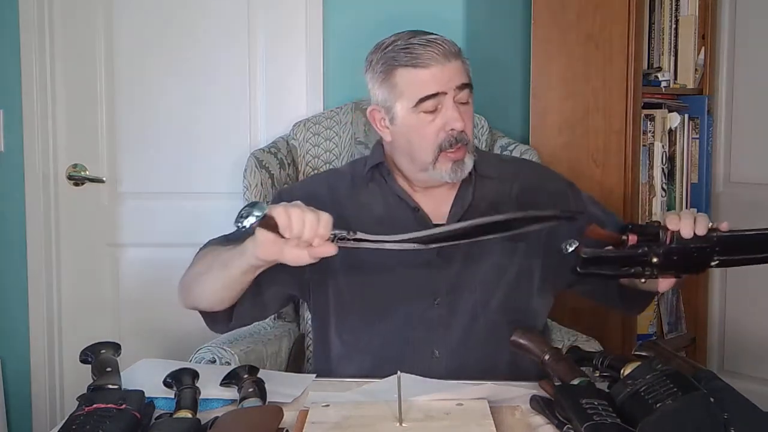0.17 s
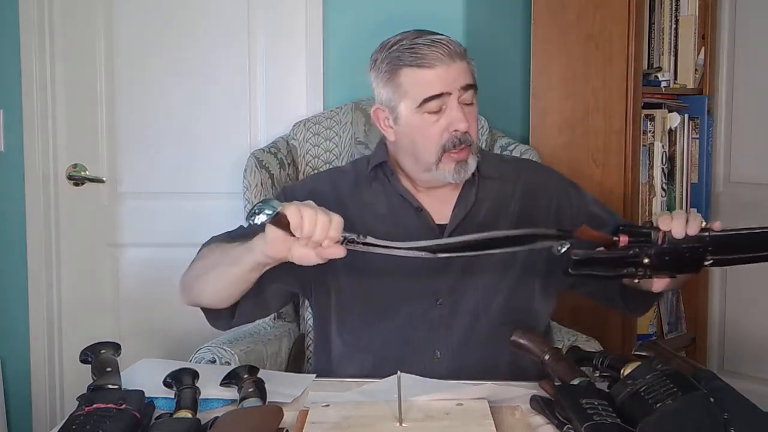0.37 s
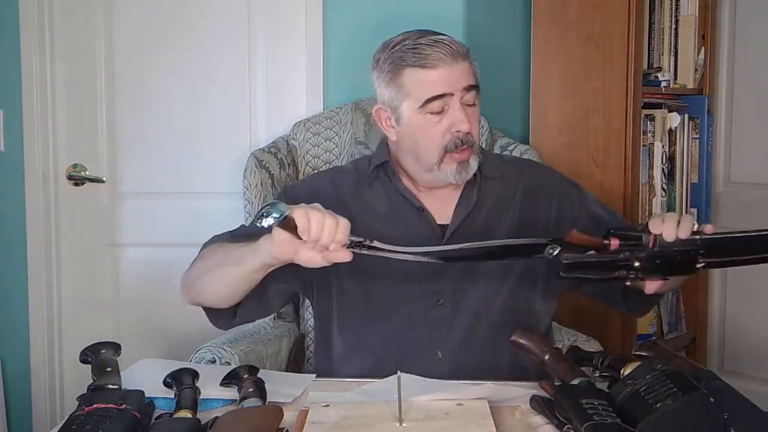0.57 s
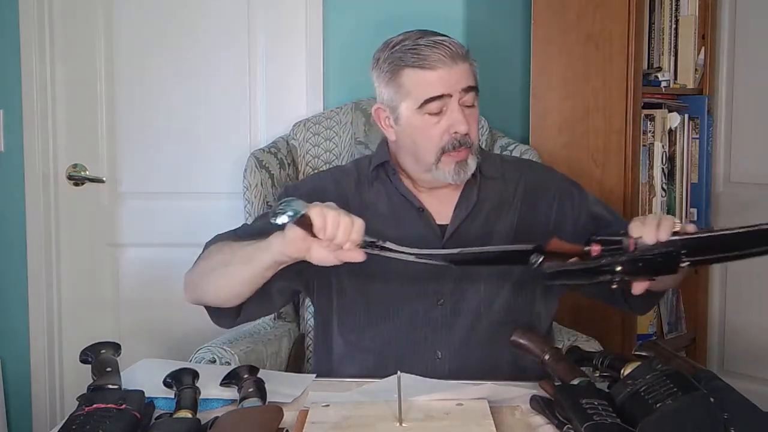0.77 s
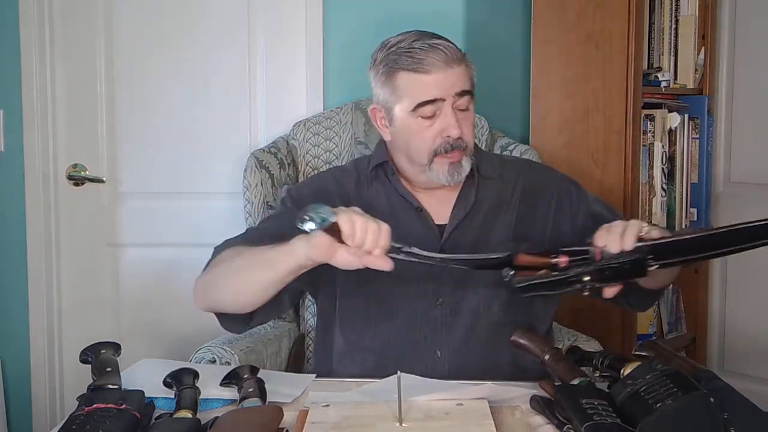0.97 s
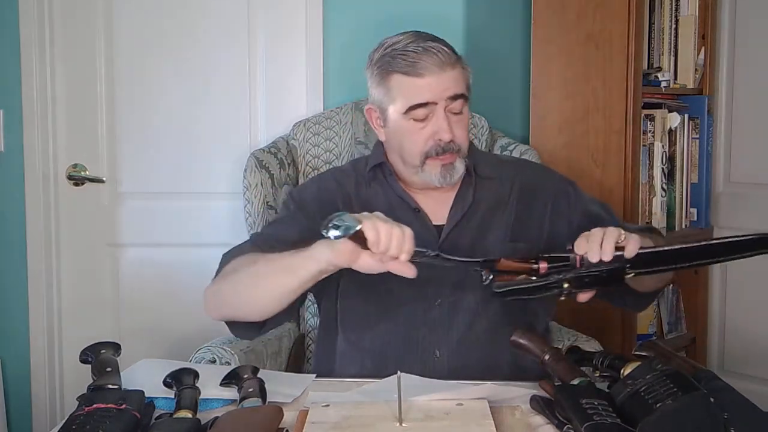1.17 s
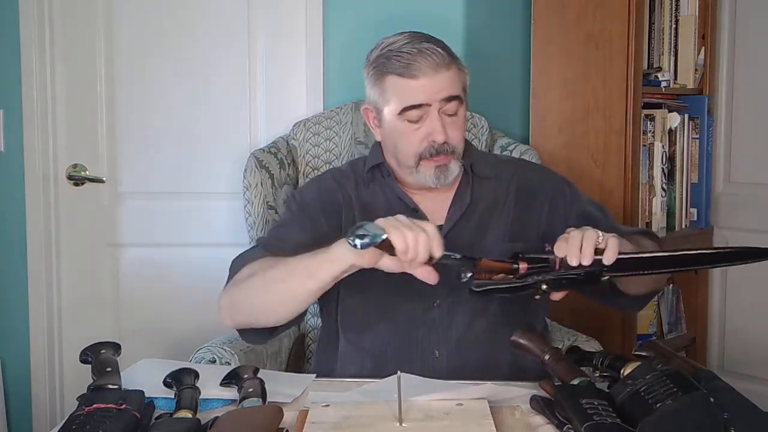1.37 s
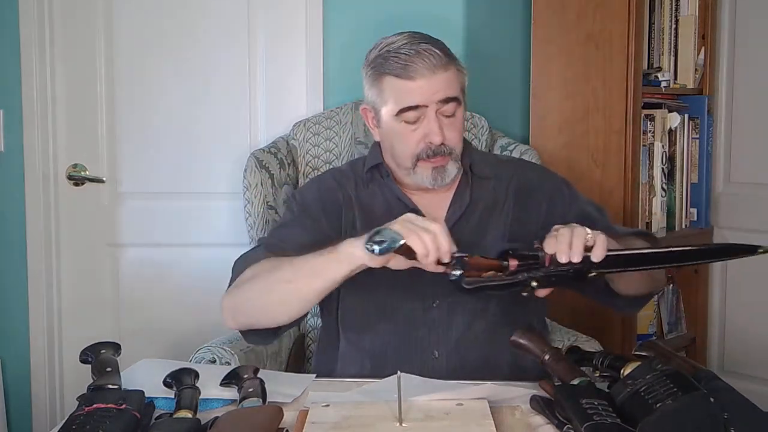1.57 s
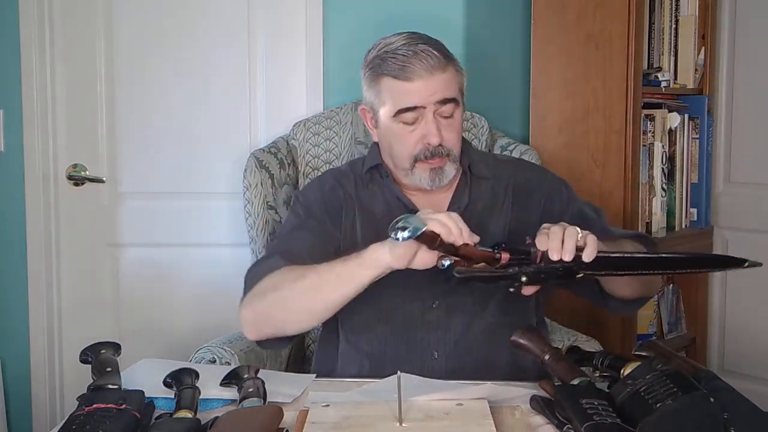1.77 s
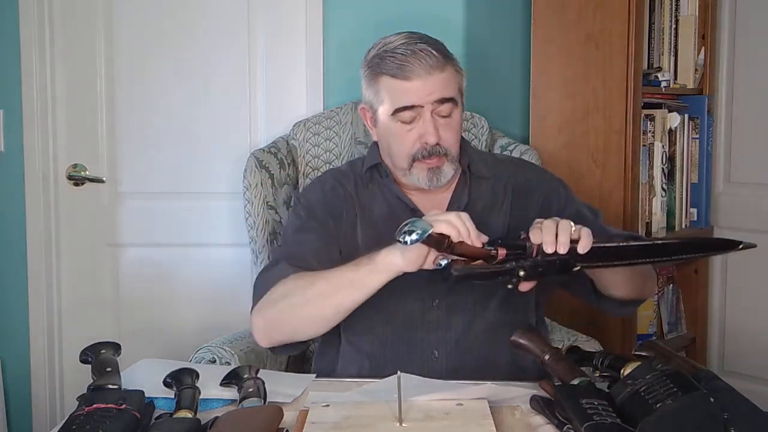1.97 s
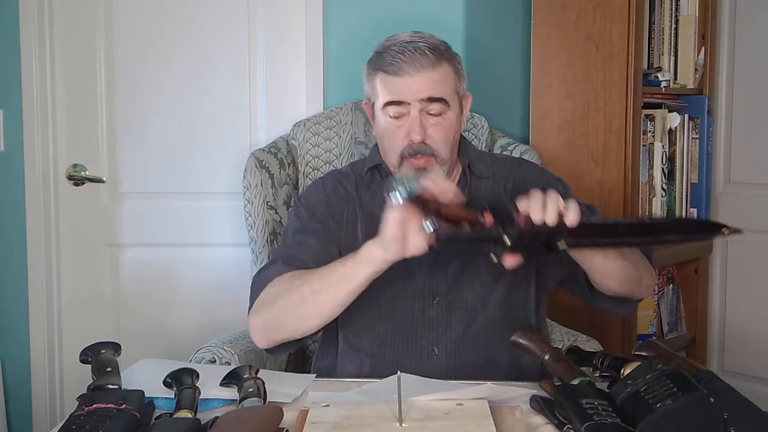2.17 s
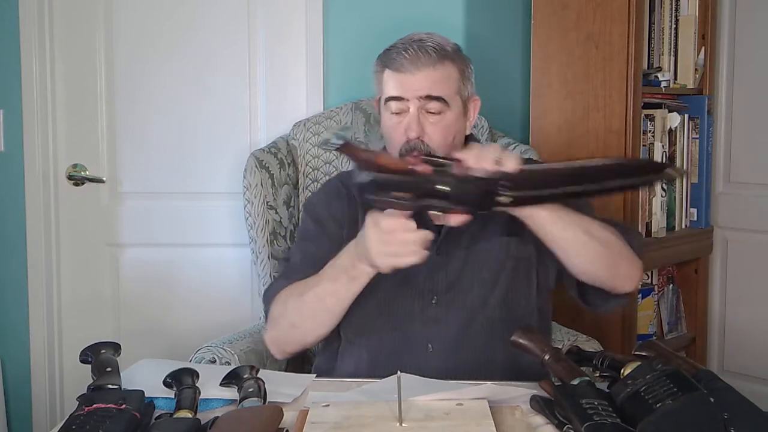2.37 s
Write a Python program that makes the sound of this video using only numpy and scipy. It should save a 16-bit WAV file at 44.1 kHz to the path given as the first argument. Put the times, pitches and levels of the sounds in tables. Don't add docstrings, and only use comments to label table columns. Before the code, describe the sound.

A heavy blade is sheathed in a wooden, leather-covered scabbard. After near quiet, faint ticks and a rub start at 0.5 s, with light knocks from 0.7 to 1.0 s. Dry scraping follows, a click at 1.45, then a loud metallic clack at 1.6 with a brief ring. A hollow double knock lands at 1.9; small ticks and a short scrape at 2.3. Small room echo, boxy midrange microphone, soft hiss and hum.

```python
import sys
import numpy as np
from scipy import signal
from scipy.fft import rfft, irfft
from scipy.io import wavfile

SR = 44100
rng = np.random.default_rng(int(sys.argv[2]) if len(sys.argv) > 2 else 0)


def to_wav(sig):
    pcm = np.clip(np.atleast_2d(sig), -1, 1) * 32767
    pcm = np.round(pcm).astype(np.int16)
    wavfile.write(sys.argv[1], SR, pcm.T)


def attenuation_scalar(level_db):
    decades = np.asarray(level_db, float) / 20
    return 10 ** decades


N = 106986
SEATING_S = 1.597


def rms_one(x):
    return x / np.sqrt(np.mean(x ** 2) + 1e-20)


def at_hz(points, hz):
    p = np.array(points)
    return np.interp(np.log(np.maximum(hz, 1)), np.log(p[:, 0]), p[:, 1])


def coloured(points):
    white = rfft(rng.standard_normal(N))
    gain = attenuation_scalar(at_hz(points, np.linspace(0, SR / 2, len(white))))
    return rms_one(irfft(white * gain, N))


def ring(x, hz, t60):
    radius, angle = attenuation_scalar(-60 / (t60 * SR)), 2 * np.pi * hz / SR
    feedback = [1, -2 * radius * np.cos(angle), radius * radius]
    return signal.lfilter([0, np.sin(angle)], feedback, x + 1e-18)


def add(out, s, sound):
    i = int(s * SR)
    out[i:i + len(sound)] += sound[:len(out) - i]


def filtered(x, kind, hz, order):
    return signal.sosfilt(signal.butter(order, hz, kind, fs=SR, output="sos"), x)


def peak_one(x):
    return x / abs(x).max(axis=1, keepdims=True)


# start in seconds, peak level in dB, body pitch in Hz,
# metallic edge in dB against the thud, room answer in dB.
KNOCKS = [(0.525, -34.5, 1370, -1, -4), (0.5304, -33.5, 2640, 17.5, -1.5), (0.726, -25.5, 1630, 11.5, -5.5),
          (0.749, -35, 1400, 23.5, -9.5), (0.882, -25, 1570, 12, -5.5), (0.918, -33.5, 1930, 4, -6.5),
          (1.008, -22.5, 2560, 15, -2.5), (1.4441, -23, 3100, 21.5, -13.5), (1.455, -32, 1690, 18.5, -3.5),
          (1.597, -8.5, 2160, 10.5, -2), (1.6127, -13, 1404, -10, -6.5), (1.841, -30.5, 2900, 18, -10),
          (1.848, -30, 2070, 14, -1.5), (1.86, -31, 1840, -1, -6.5), (1.9022, -13, 2430, 14, -1.5),
          (1.911, -11, 1560, 12.5, -9.5), (2.089, -39.5, 2970, 4, -14), (2.2976, -27, 3330, 5, -18),
          (2.306, -56, 3000, -1, 3), (2.372, -40.5, 2480, 23.5, -6.5)]


def knocks():
    chatter, thud_s, edge_s = 0.3, 0.002, 0.0008
    body_t60_s, edge_hz, room_db = 0.0035, 1960, 12
    out, t = np.zeros(N), np.arange(1000) / SR
    click = 1. * (t == 0)
    for s, db, hz, edge_db, answer_db in KNOCKS:
        touch = chatter * rng.standard_normal(len(t))
        contact = np.array([click + touch * np.exp(-t / thud_s), click])
        thud = filtered(contact, "band", [0.35 * hz, 1.4 * hz], 2)
        thud = thud + ring(thud, hz, body_t60_s) * hz / SR * 20
        scrape = np.array([click + touch * np.exp(-t / edge_s), click])
        edge = filtered(scrape, "high", edge_hz, 2)
        direct, to_room = attenuation_scalar(db) * (peak_one(thud) + attenuation_scalar(edge_db) * peak_one(edge))
        add(out, s, direct)
        add(out, s, attenuation_scalar(answer_db + room_db) * room(to_room))
    return out


# pitch in Hz, level in dB, decay by 60 dB in seconds.
GUARD_MODES = [(7180, -26, .004), (11100, -16, .004), (13100, -10, .004)]


def guard():
    chatter_s, crack_hz, level_db, room_db = 0.00078, 7500, 10, 11
    out, t = np.zeros(N), np.arange(2000) / SR
    chatter = rng.standard_normal(len(t)) * np.exp(-t / chatter_s)
    contact = np.array([chatter, 1. * (t == 0)])
    crack = filtered(contact, "high", crack_hz, 4)
    modes = sum(attenuation_scalar(db) * ring(contact, hz, t60) for hz, db, t60 in GUARD_MODES)
    direct, to_room = attenuation_scalar(level_db) * (crack + modes)
    add(out, SEATING_S, direct)
    add(out, SEATING_S, attenuation_scalar(room_db) * room(to_room))
    return out


# pitch in Hz, level in dB, decay by 60 dB in seconds.
RING = [(861, -12, .1), (935, -4, 0.22), (1022, -10.5, 0.15), (1356, -9, 0.06), (1270, -4, 0.085),
        (1550, -22, .15), (1698, -13, .12), (2230, -19, 0.17), (2214, -4.5, .12), (2609, -11, 0.26),
        (3530, 0.5, 0.063)]


def blade_ring():
    level_db = -17.5
    click = 1. * (np.arange(N) == int(SEATING_S * SR))
    return sum(attenuation_scalar(level_db + db) * ring(click, hz, t60) for hz, db, t60 in RING)


# start in seconds, peak level in dB, pitch in Hz.
THUMPS = [
    (0.726, -47.5, 474),
    (0.752, -47.5, 248),
    (1.007, -39.5, 445),
    (1.02, -51, 324),
    (1.598, -35, 465),
    (1.903, -45.5, 200),
    (1.904, -33.5, 816),
]


def thumps():
    t60_s, room_db = 0.014, 4.5
    out, t = np.zeros(N), np.arange(4000) / SR
    for s, db, hz in THUMPS:
        level = attenuation_scalar(db - at_hz(MIC, hz))
        hit = level * np.sin(2 * np.pi * hz * t) * attenuation_scalar(-60 * t / t60_s)
        add(out, s, hit)
        add(out, s, attenuation_scalar(room_db) * room(hit))
    return out


# time in seconds, level in dB.
RUB = [(0, -72.5), (0.502, -74), (0.559, -58), (.68, -75), (.8, -68), (1.0, -63.5), (1.11, -56),
       (1.18, -58.5), (1.229, -55.5), (1.3, -63.5), (1.4, -59), (1.5, -61), (1.801, -62.5), (2.001, -63.5),
       (2.12, -63), (2.278, -67.5), (2.331, -53), (2.43, -86)]


def rub():
    slips_per_s, spread_db, room_db = 490, -5.5, -3.5
    body_hz, rasp_hz, rasp_db, rasp_follows = 2480, 4800, 4.5, 1.3
    s, db = np.transpose(RUB)
    db = np.interp(np.arange(N) / SR, s, db)
    sizes = attenuation_scalar(spread_db * np.minimum(rng.exponential(1, N), 4)) * rng.choice([-1, 1], N)
    slips = sizes * (rng.random(N) < slips_per_s / SR)
    body = attenuation_scalar(db + 19.5) * rms_one(filtered(slips, "high", body_hz, 1))
    rasp = rms_one(filtered(slips, "high", rasp_hz, 3))
    rasp = attenuation_scalar(rasp_db + rasp_follows * (db - db.max())) * rasp
    direct = body + attenuation_scalar(db.max() + 20.5) * rasp
    return direct + attenuation_scalar(room_db) * room(direct)[:N]


# frequency in Hz, decay by 60 dB in seconds.
ROOM_T60 = [(300, 0.42), (800, 0.32), (2000, 0.34), (5500, 0.27), (12000, 0.28)]


def room(x):
    wall_gap_s, early_per_s, early_db, early_t60_s = 0.0051, 1100, -1.5, 0.27
    t = np.arange(SR // 2) / SR
    white, tail = rng.standard_normal(len(t)), 0
    for low in 125 * 2. ** np.arange(7):
        band = filtered(white, "band", [low, 2 * low], 2)
        tail = tail + band * attenuation_scalar(-60 * t / at_hz(ROOM_T60, low * np.sqrt(2)))
    echoes = (rng.random(len(t)) < early_per_s / SR) * rng.uniform(-1.36, 1, len(t))
    early = echoes * attenuation_scalar(-60 * t / early_t60_s)
    answer = rms_one(tail) + attenuation_scalar(early_db) * rms_one(early)
    answer = answer * np.clip(t / wall_gap_s, 0, 1) ** 2
    return signal.fftconvolve(x, answer / np.sqrt(np.sum(answer ** 2)))


# frequency in Hz, level in dB per Hz.
AIR = [(200, 11), (1000, -4), (3000, -4.5), (4300, -4), (5400, -2.5), (6600, -23), (16000, -37)]


def air():
    return attenuation_scalar(-46.5) * coloured(AIR)


def scene():
    return (knocks() + guard() + blade_ring() + thumps() + rub() + air())[None]


# frequency in Hz, gain in dB.
MIC = [(100, -43.5), (400, -28.5), (900, -4.5), (1400, -2.5), (3000, -4), (4300, -17), (6500, -38.5),
       (13500, -55.5)]
# centre in Hz, width in Hz, peak in dB.
HOUSING = [(1368, 210, 5.2), (2072, 490, 6.6), (2910, 700, 3.5), (7350, 2000, 12), (11000, 4500, 6.6)]
# centre in Hz, width in Hz.
NOTCHES = [(6000, 1330), (8080, 970), (16500, 1000)]


def microphone(x):
    size = 4096
    hz = np.linspace(0, SR / 2, size // 2 + 1)
    db = at_hz(MIC, hz)
    for centre_hz, width_hz, peak_db in HOUSING:
        db = db + peak_db / (1 + (2 * (hz - centre_hz) / width_hz) ** 2)
    for centre_hz, width_hz in NOTCHES:
        off = (hz - centre_hz) ** 2
        db = db + 10 * np.log10((off + 820.0) / (off + width_hz ** 2))
    cep = irfft(db * np.log(10) / 20, size)
    cep = np.concatenate([cep[:1], 2 * cep[1:size // 2], np.zeros(size // 2)])
    return signal.fftconvolve(x, irfft(np.exp(rfft(cep)), size))[:N]


# frequency in Hz, level in dB per Hz.
HISS = [(20, 2), (150, -1), (500, -1), (2000, -27), (5000, -51.5), (8300, -32.5), (11000, -21.5),
        (15500, -29)]


def amplifier_noise():
    hiss_db, hum_hz, hum_db = -65, 60, -77
    hum = attenuation_scalar(hum_db) * np.sqrt(2) * np.sin(2 * np.pi * hum_hz * np.arange(N) / SR)
    return attenuation_scalar(hiss_db) * coloured(HISS) + hum


def low_pass(x):
    return signal.sosfilt(signal.butter(12, 16200, fs=SR, output="sos"), x)


def record(dry):
    mix = (microphone(dry[0]) + amplifier_noise())[None]
    return low_pass(mix)


dry = scene()
out = record(dry)
to_wav(out)
```